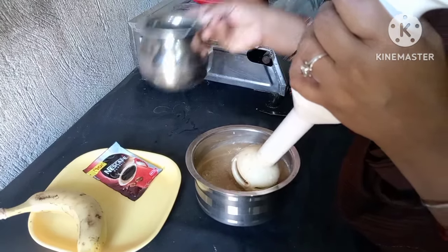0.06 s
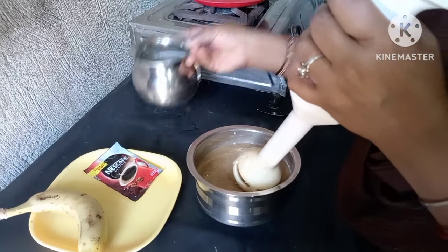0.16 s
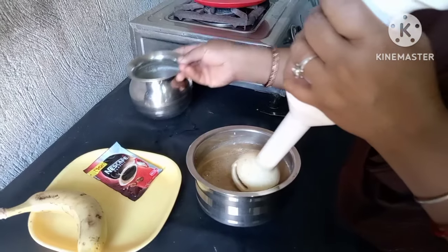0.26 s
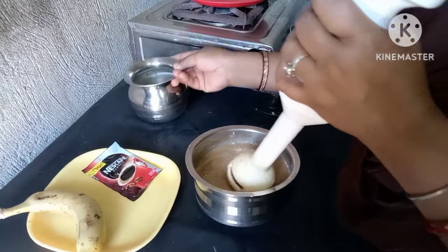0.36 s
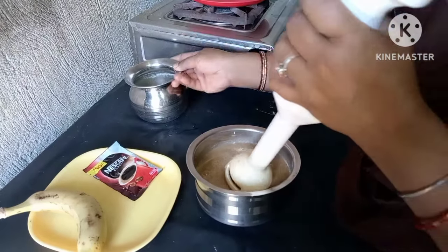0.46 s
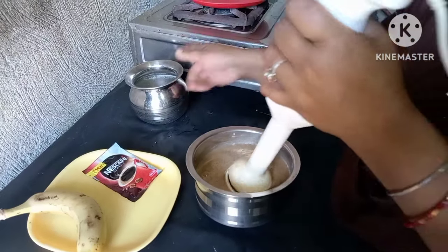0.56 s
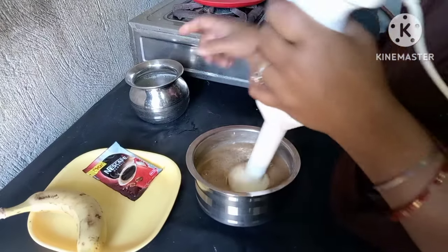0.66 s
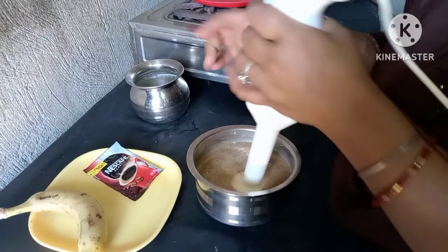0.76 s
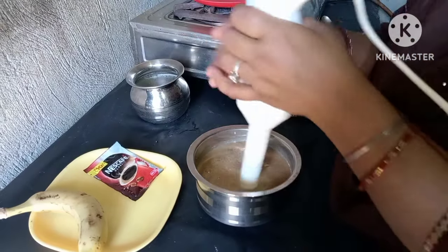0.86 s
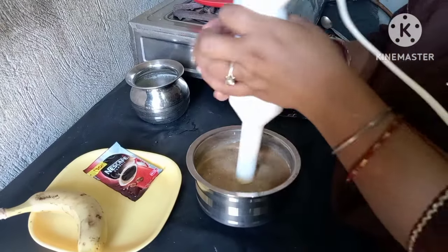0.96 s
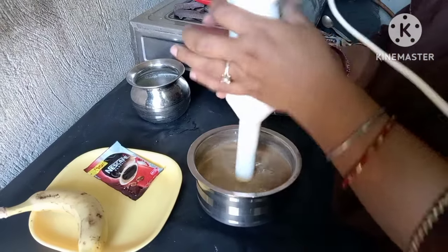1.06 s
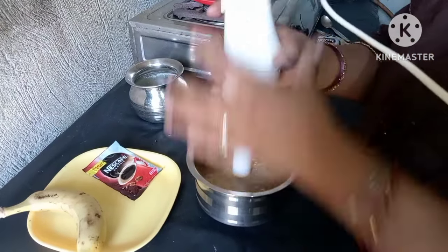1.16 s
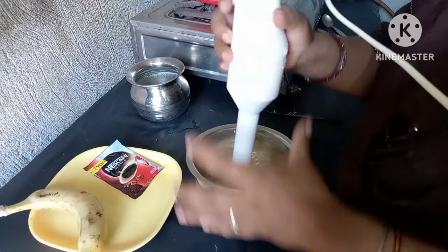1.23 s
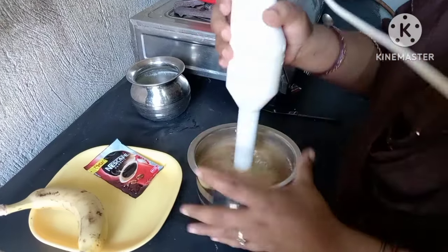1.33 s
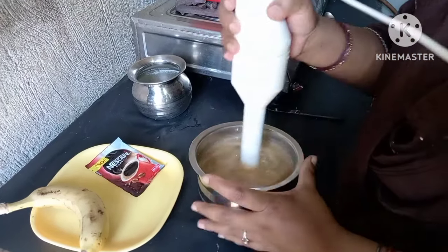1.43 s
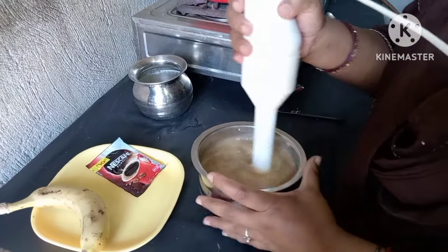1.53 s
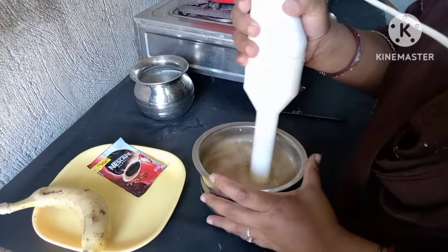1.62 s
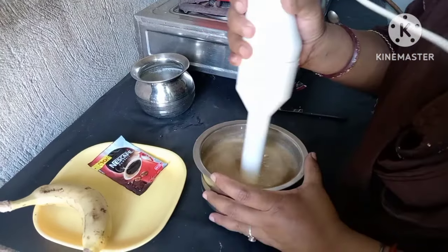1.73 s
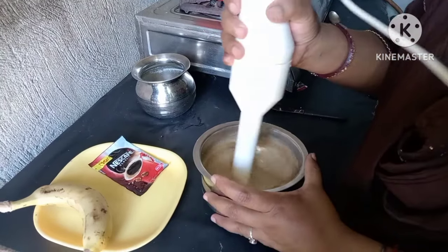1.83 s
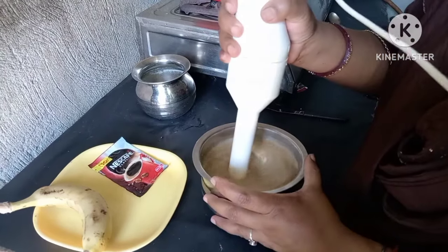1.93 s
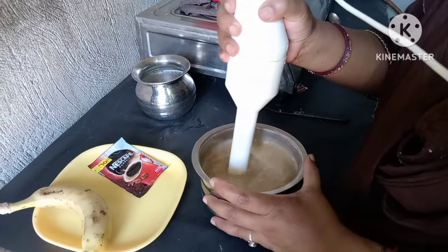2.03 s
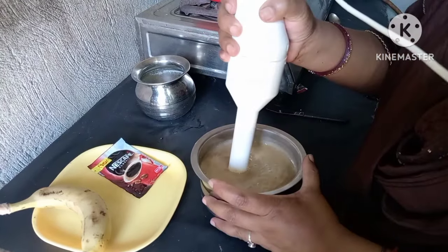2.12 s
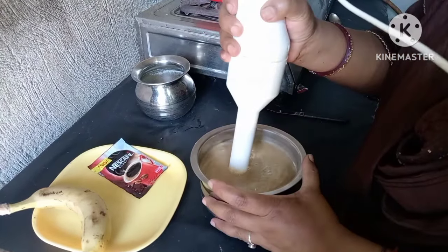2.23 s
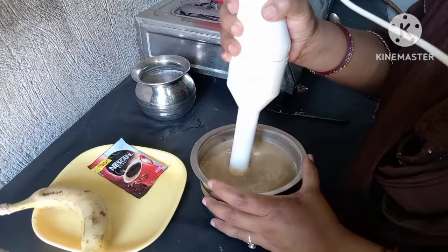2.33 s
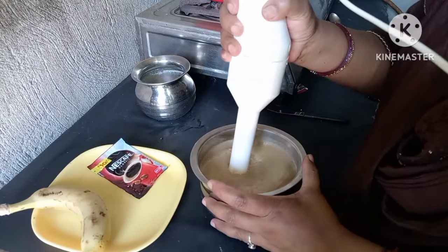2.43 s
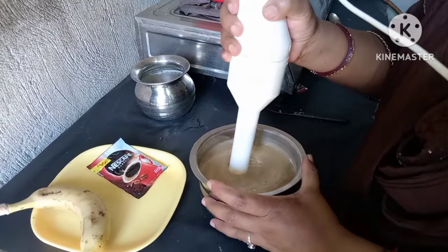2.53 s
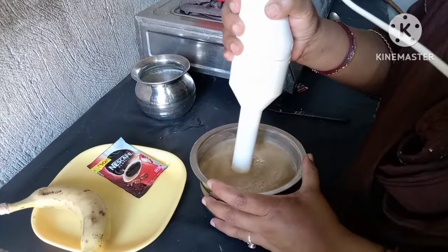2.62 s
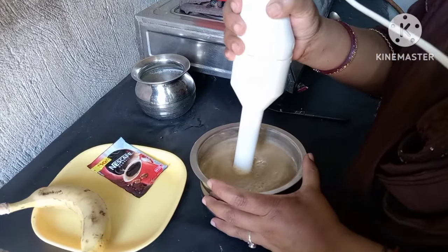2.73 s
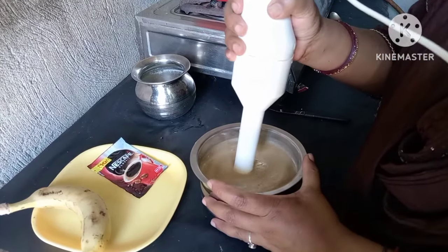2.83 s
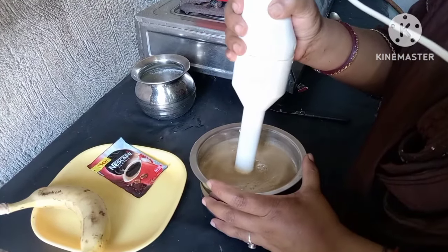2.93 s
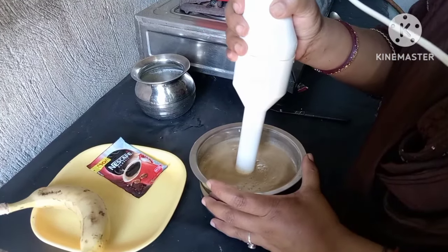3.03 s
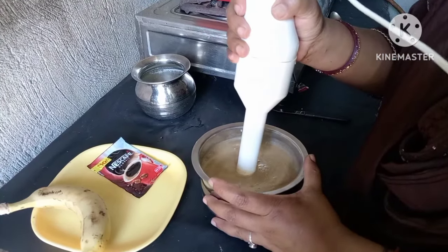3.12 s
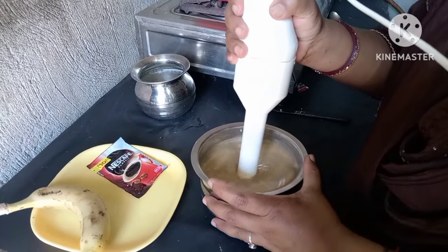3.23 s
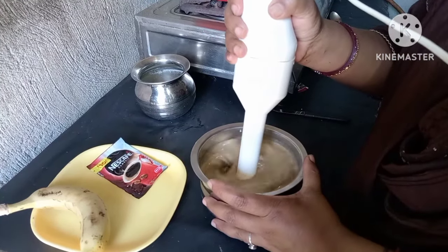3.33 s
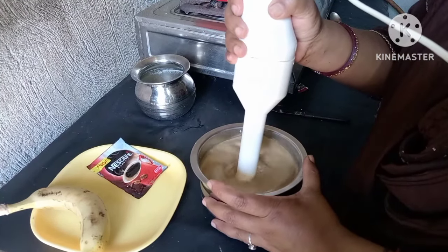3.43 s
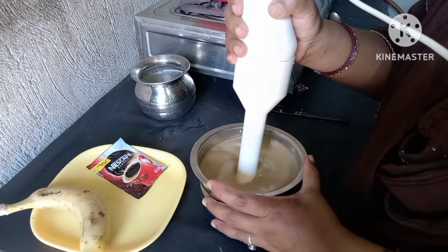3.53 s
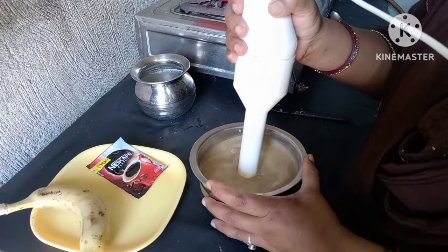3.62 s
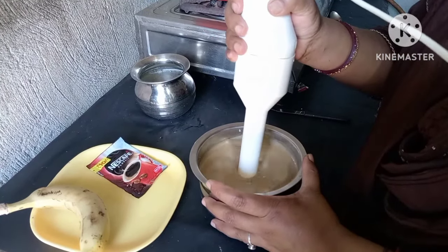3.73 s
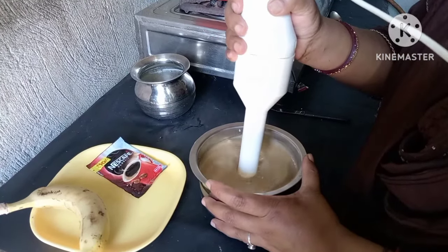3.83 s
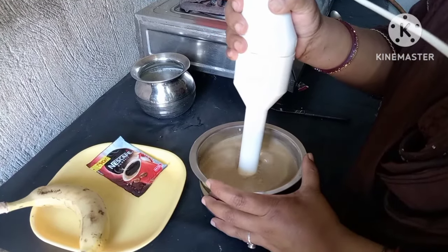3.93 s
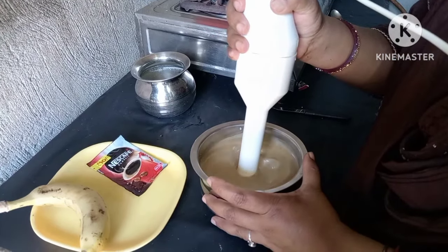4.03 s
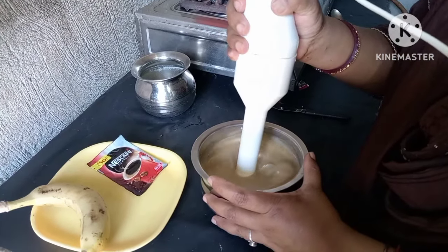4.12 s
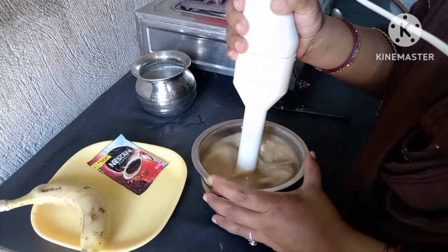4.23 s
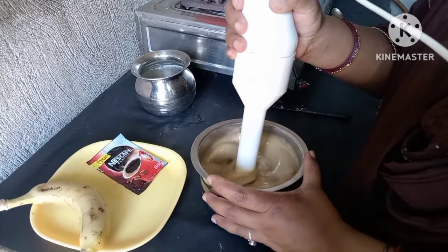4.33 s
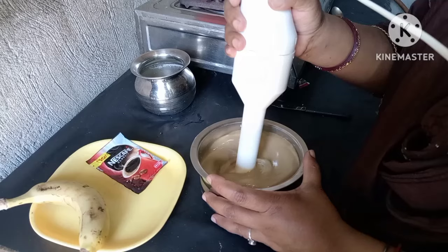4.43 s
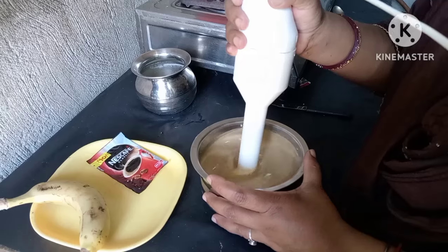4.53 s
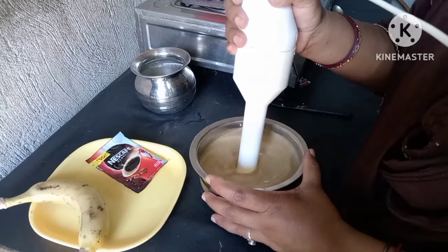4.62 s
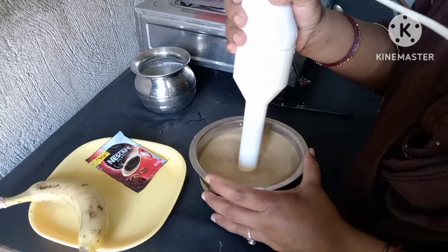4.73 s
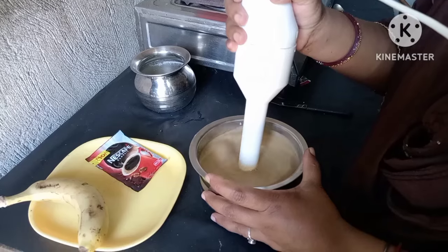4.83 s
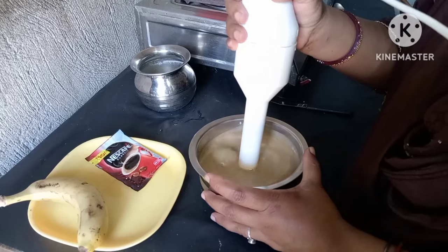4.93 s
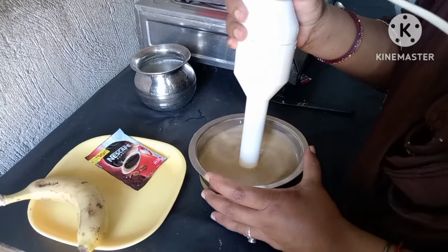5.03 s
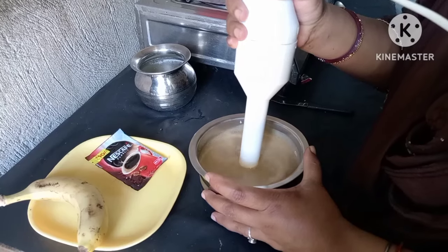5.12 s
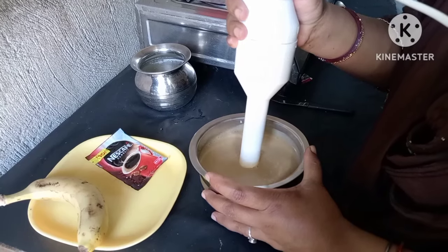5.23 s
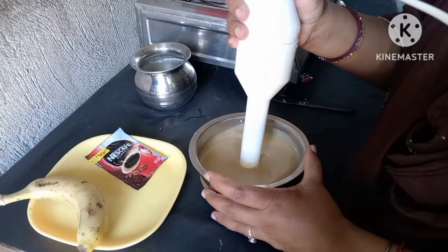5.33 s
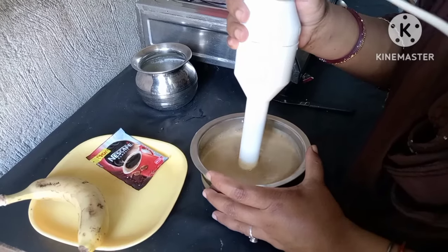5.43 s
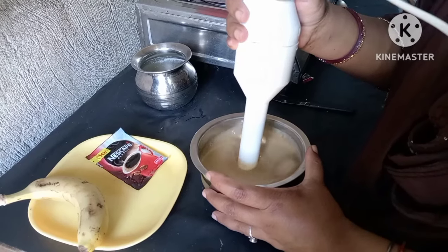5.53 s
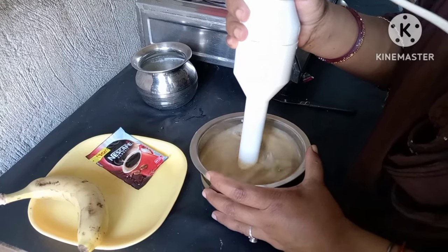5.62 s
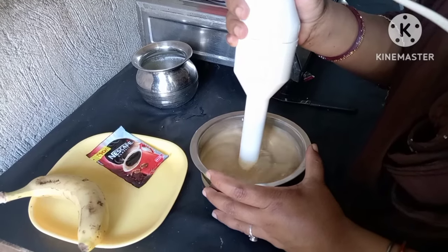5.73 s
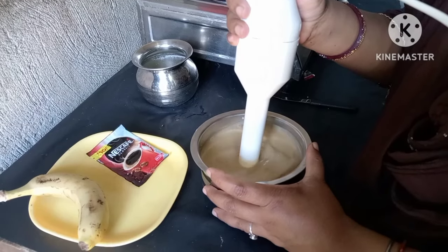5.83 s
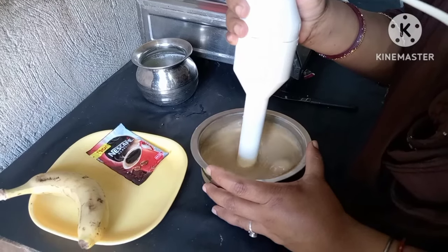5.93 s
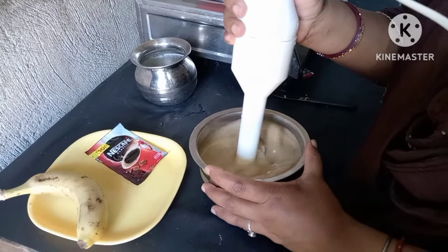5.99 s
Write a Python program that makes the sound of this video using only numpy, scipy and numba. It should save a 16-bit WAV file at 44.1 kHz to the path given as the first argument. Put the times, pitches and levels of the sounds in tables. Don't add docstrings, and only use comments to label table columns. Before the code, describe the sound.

Scattered counter knocks come first, low and solid with small plastic rattles and a steel clink, over soft room murmur. Then a button clicks and a hand blender bites into thick liquid in a steel pot, roaring briefly and cutting off fast. A longer burst follows, then soft bubbling glugs, then two more quick bursts, the last swelling with a ringing slap. Close, slightly overloaded phone sound with little echo.

```python
import sys
import numpy as np
from scipy import signal
from scipy.fft import rfft, irfft, next_fast_len
from scipy.io import wavfile
from scipy.ndimage import uniform_filter1d
from numba import njit

SR = 44100
rng = np.random.default_rng(int(sys.argv[2]) if len(sys.argv) > 2 else 0)


def gain_from_db(level_db):
    decades = np.asarray(level_db, float) / 20
    return 10 ** decades


def bounce(signal):
    frames = np.transpose(np.atleast_2d(signal))
    limited = np.clip(frames, -1, 1)
    pcm = np.round(limited * 32767).astype(np.int16)
    wavfile.write(sys.argv[1], SR, pcm)


N = 267157
T = np.arange(N) / SR


def level(x, db):
    return x * gain_from_db(db) / np.sqrt(np.mean(x ** 2))


def colour(x, table, sign=1):
    hz, db = np.transpose(table)
    size = next_fast_len(N + SR)
    f = np.maximum(np.arange(size // 2 + 1) * SR / size, 1)
    gain = gain_from_db(sign * np.interp(np.log(f), np.log(hz), db))
    return irfft(rfft(x, size) * gain, size)[..., :N]


@njit
def svf(x, hz, width):
    y, b, l = np.empty(len(x)), 0., 0.
    for i in range(len(x)):
        g, k = np.tan(np.pi * hz[i] / SR), width / hz[i]
        v = (b + g * (x[i] - l)) / (1 + g * (g + k))
        b, l, y[i] = 2 * v - b, l + 2 * g * v, k * v
    return y


def band(x, hz, width):
    return svf(x, np.full(N, float(hz)), float(width))


def walk(rate):
    k = int(SR / rate)
    steps = np.repeat(rng.standard_normal(N // k + 1), k)
    return 1.3 * uniform_filter1d(uniform_filter1d(steps, k), k)[:N]


def bump(s, half):
    return np.exp(-((T - s) / half) ** 2)


def slaps(rate, scatter_db):
    when, sign, size = rng.random(N), rng.standard_normal(N), rng.exponential(size=N)
    return (when < rate / SR) * np.sign(sign) * gain_from_db(scatter_db * np.minimum(size, 3))


def resonate(x, modes, drift):
    total = np.zeros(N)
    for hz, width, db in modes:
        moving_hz = hz * (1 + drift * walk(12))
        total += gain_from_db(db) * svf(x, moving_hz, 1. * width) / np.sqrt(width)
    return level(total, 0)


def add(out, s, modes, push=0.0002):
    i = int(s * SR)
    t = np.arange(min(SR // 2, N - i)) / SR
    hz, db, t60 = np.transpose(modes)[:, :, None]
    rings = gain_from_db(db - 60 * t / np.maximum(t60, .005)) * np.sin(2 * np.pi * hz * t)
    out[i:i + len(t)] += rings.sum(0) * (1 - np.exp(-t / push))


# [f/Hz, level/dB per Hz]
CHURN = [(120, -51), (200, -17), (308, -10.5), (345, -11.5), (382, -5.5), (650, -3.5), (1310, -8.5),
         (1450, -15), (3000, -19), (3900, -48.5), (6600, -120)]
# [f/Hz, level/dB per Hz]
HISS = [(760, -22.5), (1300, -2), (1460, -7.5), (1580, -3.5), (1810, -6.5), (2010, -2.5), (2470, -7.5),
        (2860, -6), (3300, -10.5), (3820, -7.5), (4880, -16.5), (5560, -19.5), (6290, -29.5), (7320, -38),
        (9520, -64), (16100, -120)]
# [f/Hz, width/Hz, level/dB]
POT_WALL = [(497.5, 7.6, -2.5), (691.6, 25, -1), (935, 99, -1), (1113, 32, -10), (1312, 18, -4.5),
            (2090, 90, -13.5)]
# [t/s, level/dB over churn, half length/s, f/Hz]
SWELLS = [(3.166, -10, .025, 270.7), (3.28, -13.5, 0.044, 360), (4.02, -8, .03, 290),
          (4.08, -10, 0.037, 335.7), (4.17, -3, 0.032, 353), (4.24, -8.5, 0.028, 350.4),
          (4.33, -4.5, 0.071, 392.2), (5.43, -7.5, .03, 320), (5.5, 3, 0.019, 329.9), (5.6, -3.5, .06, 355),
          (5.84, -7.5, 0.021, 338), (5.917, 12, 0.039, 344), (6.02, -4, 0.052, 341)]
POT_RING_DB, DULL_BELOW_DB, DULL_RANGE_DB = -19.5, -42.5, 25


def blender():
    churn_db, hiss_db, light_db, hum_db, shaft_hz, lean_db = presses()
    turn = 2 * np.pi * np.cumsum(shaft_hz * (1 + 0.028 * walk(30))) / SR
    blows = slaps(rate=1200, scatter_db=1.0)
    liquid = level(colour(blows, CHURN), -3.5)
    wall = level(resonate(blows, POT_WALL, drift=0.036), -12.5)
    vortex, power = funnels(blows)
    churn = (liquid + wall + vortex) / np.sqrt(0.51 + power)

    swell_s, _, _, swell_hz = np.transpose(SWELLS)
    ring_hz = np.interp(T, swell_s, swell_hz)
    swell = gain_from_db(POT_RING_DB) + sum(gain_from_db(db) * bump(s, half) for s, db, half, _ in SWELLS)
    sway = np.sin(2 * np.pi * np.cumsum(ring_hz) / SR) * gain_from_db(walk(25))
    ring = level(sway, -2) + level(svf(blows, ring_hz, 45.), -7)

    rumble = band(band(blows, 190, 230), 190, 230)
    hum = level(np.sin(turn) * gain_from_db(6.4 * walk(25)), -6.5) + level(rumble, -6)

    spray = rng.standard_normal(N) * (1 + 0.087 * np.cos(turn))
    spray += level(slaps(rate=2500, scatter_db=-1.0), -6)
    hiss = level(colour(spray, HISS) * gain_from_db(2.2 * walk(40)), 0)
    dull = np.clip((DULL_BELOW_DB - hiss_db) / DULL_RANGE_DB, 0, 1)
    hiss += dull * (signal.sosfilt(signal.butter(2, 2600, fs=SR, output="sos"), hiss) - hiss)
    brushes = level(band(band(spray, 5800, 2100), 5800, 2100), 0)
    hiss += gain_from_db(-19.5 + 2.2 * np.minimum(uniform_filter1d(light_db, size=2500), 6)) * brushes
    motor = gain_from_db(churn_db) * (churn + swell * ring) + gain_from_db(hum_db) * hum + gain_from_db(hiss_db) * hiss
    return motor, lean_db


# [down t/s, blades bite t/s, up t/s, full churn level/dB, coasting loss/dB per s]
PRESSES = [
    (3.077, 3.154, 3.223, -13.5, 119.5),
    (3.926, 3.967, 4.348, -16, 112.5),
    (5.31, 5.363, 5.451, -14, 129),
    (5.733, 5.82, 6.058, -17, 74),
]
# [churn held back before bite/dB, hiss over churn/dB, hum over churn/dB, lean left minus right/dB]
SEATING = [
    (9.2, -1, -13, 0),
    (21.47, -3.5, -16, 0.5),
    (10.8, -3.5, -18, -0.5),
    (2.99, -1.5, -19.5, 0.5),
]
# [t/s, churn loss/dB, slap level/dB]
GULPS = [
    (4.192, 3, 5),
    (4.11, -0.5, 2.5),
    (5.92, 2, 1.5),
]
START_DB, BITE_S, SAG_DB_PER_S = -61.5, 0.0062, 6.5
IDLE_HZ, FULL_HZ, SPIN_UP_S, COAST_HZ_PER_S = 95, 163.7, .07, 40
GULP_S, SPIN_CURVE, HISS_HELD = 0.016, 0.47, .3
HISS_LINGERS, HUM_LINGERS = 0.099, .35
LINGER_DB, HISS_GATED = 29, .2
LEAN_DB_PER_S = -7.5
GATE_DB, GATE_SLOPE = -43, 1.2


def gate(db):
    return db - GATE_SLOPE * np.maximum(GATE_DB - db, 0)


def presses():
    k = np.maximum(np.searchsorted(np.transpose(PRESSES)[0], T) - 1, 0)
    down, bite, up, full_db, coast = np.array(PRESSES)[k].T
    held_db, hiss_db, hum_db, lean_db = np.array(SEATING)[k].T
    spin = np.clip((T - down) / (bite - down), 0, 1) ** SPIN_CURVE
    motor_db = START_DB + (full_db - START_DB) * spin
    motor_db -= SAG_DB_PER_S * np.clip(T - bite, 0, up - bite)
    motor_db -= 200 * (T < down)
    loss = coast * np.maximum(T - up, 0)
    light = held_db * spin * np.clip((bite - T) / BITE_S, 0, 1)
    for s, dip, slap in GULPS:
        light += dip * bump(s, GULP_S) - slap * bump(s + 1.5 * GULP_S, .6 * GULP_S)

    coasting_db, spared_db = gate(motor_db - loss), np.minimum(loss, LINGER_DB)
    churn_db = coasting_db - light
    hiss_db = coasting_db + HISS_LINGERS * spared_db + hiss_db - HISS_HELD * light
    hiss_db -= HISS_GATED * np.maximum(loss - LINGER_DB, 0)
    hum_db = coasting_db + HUM_LINGERS * spared_db + hum_db
    shaft_hz = FULL_HZ - (FULL_HZ - IDLE_HZ) * np.exp(-np.maximum(T - down, 0) / SPIN_UP_S)
    shaft_hz -= COAST_HZ_PER_S * np.clip(T - up, 0, .5)
    lean_db = lean_db + LEAN_DB_PER_S * np.clip(T - down, 0, .6)
    return churn_db, hiss_db, light, hum_db, shaft_hz, lean_db


# [t/s, length/s, first f/Hz, last f/Hz, level/dB over churn]
FUNNELS = [(3.134, 0.07, 725, 708.6, -0.5), (3.18, .055, 605, 590, -6.5), (3.197, .07, 910, 876, -5),
           (3.223, 0.1, 790, 743, -6.5), (3.301, .3, 819.6, 680, -10), (3.986, .085, 877, 686, 0.5),
           (4.034, .14, 630, 463.7, 2), (3.971, .15, 1002, 877, -7.5), (4.091, .09, 750, 670, -3),
           (4.19, .045, 1140, 1135, -1.5), (4.237, 0.1, 1170, 1089, -7.5), (5.35, .13, 690, 611.7, -2.5),
           (5.356, 0.062, 960, 899, -8.5), (5.37, .14, 520, 448.5, -7), (5.842, .06, 945, 910, -12.5),
           (5.956, 0.064, 810, 792, -9.5)]


def funnels(blows):
    out, power = np.zeros(N), np.zeros(N)
    waver, flutter = 1 + .01 * walk(60), gain_from_db(1.5 * walk(50))
    for s, length, first_hz, last_hz, db in FUNNELS:
        part = np.arange(int(length * SR)) / (length * SR)
        span = slice(int(s * SR), int(s * SR) + len(part))
        hz = first_hz + (last_hz - first_hz) * part
        column = level(svf(blows[span], hz, 60.) + 0.46 * svf(blows[span], 1.4 * hz, 90.), -4)
        column += .9 * np.sin(2 * np.pi * np.cumsum(hz * waver[span]) / SR) * flutter[span]
        gain = gain_from_db(db) * np.sqrt(np.sin(np.pi * part))
        out[span] += gain * column
        power[span] += gain ** 2
    return out, power


# [t/s, peak level/dB, housing f/Hz]
SWITCH = [
    (3.079, -26.5, 587),
    (3.927, -35, 404),
    (5.312, -31.5, 442),
    (5.75, -22.5, 410.6),
]


def switch():
    out = np.zeros(N)
    for s, db, hz in SWITCH:
        add(out, s, [(hz, db - 10, .08), (1.3 * hz, db - 11, .06), (2050, db - 19, .05)])
    return out


# [t/s, thud level/dB, body over thud/dB, clink over thud/dB, t60/s]
FOOT_KNOCKS = [
    (0.41, -43, -8, -10, 0.092),
    (0.861, -52, 0, -9, 0.4),
    (0.991, -25, -6.5, -37, 0.18),
    (1.211, -28, -2.5, -28.5, 0.2),
    (1.522, -28, -5, -38, 0.28),
    (1.862, -36.5, -2.5, -33, 0.21),
]
JUG_KNOCKS = [
    (0.419, -36.5, -5, -1, 0.072),
    (0.43, -17.5, -12.5, -38, 0.38),
    (0.763, -48.5, 5.5, -16.5, 0.24),
    (0.89, -24, -4, -37, 0.22),
    (2.502, -48.5, -10, -26.5, 0.25),
]
SETTLES = [
    (0.459, -35, 0.5, -23.5, 0.37),
    (0.914, -31.5, -9.5, -35, 0.067),
    (1.029, -34, -8, -25, 0.26),
    (1.277, -39, -8, -28, 0.4),
    (1.305, -38.5, -7.5, -34, 0.34),
    (1.559, -28.5, -20, -38, 0.15),
    (1.589, -40.5, -14, -30, .08),
    (1.701, -53.5, 10, -10, 0.17),
]
# [body f/Hz, contact/s, chatter over body/dB]
STRUCK = [
    (670, 0.00015, -6.5),
    (290, 0.00022, -10.5),
    (290, 0.019, -6),
]
# [f/Hz, level/dB]
COUNTER = [(105, -2), (124, 1), (155, 2), (190, -4), (250, -7), (330, -7)]
# [f/Hz, width/Hz, level/dB]
FOOT = [(365, 270, 6.5), (660, 130, 1), (910, 69, -2.5), (1220, 430, -20), (1850, 810, -10.5)]
# [f/Hz, width/Hz, level/dB]
STEEL = [(2410, 120, 1.5), (2966, 210, -4), (3390, 170, -8), (3960, 320, 4.5), (4620, 350, -1),
         (5240, 240, -5), (5710, 1300, 2), (6500, 100, -17)]


def knocks():
    out, chatter, clink = np.zeros(N), np.zeros(N), np.zeros(N)
    for rows, (body_hz, contact, chatter_db) in zip([FOOT_KNOCKS, JUG_KNOCKS, SETTLES], STRUCK):
        scatter = rng.standard_normal((len(rows), len(COUNTER)))
        for (s, db, body_db, clink_db, t60), luck in zip(rows, scatter):
            body_db = db + body_db
            clink_db = db + clink_db
            thud = [(hz, db + d - 6.5 + 2 * x, t60) for (hz, d), x in zip(COUNTER, luck)]
            add(out, s, thud, push=0.0015 + contact)
            body = [(body_hz, body_db, 0.33 * t60), (2100, body_db - 17, .04), (1350, body_db - 11, .05)]
            add(out, s, body, push=contact)
            add(out, s + 0.0022, [(680, body_db, 0.025)], push=contact)
            after = np.maximum(T - s, 0)
            fade_db, rise = -60 * after / max(t60, .02), 1 - np.exp(-after / contact)
            chatter += rise * gain_from_db(body_db + chatter_db + fade_db)
            clink += rise * (gain_from_db(clink_db + fade_db) + gain_from_db(clink_db - 22 + 0.26 * fade_db))
    chatter, clink = uniform_filter1d([chatter, clink], size=90, origin=44)
    grit = slaps(rate=1500, scatter_db=2.5)
    foot = signal.sosfilt(signal.butter(6, 2500, fs=SR, output="sos"), resonate(grit, FOOT, drift=0.086))
    scratch = level(band(rng.standard_normal(N), 3500, 4900), -3) * gain_from_db(2.9 * walk(41.4))
    return out + chatter * foot + clink * (resonate(grit, STEEL, drift=0.0095) + scratch)


# [t/s, peak level/dB, f/Hz, neighbour notes level/dB]
GLUGS = [
    (4.821, -29.5, 397.5, -10.5),
    (4.832, -30.5, 397.5, -6),
    (4.892, -29.5, 390, -5),
    (4.912, -28, 408, -17),
    (4.95, -30, 463, -3),
    (4.965, -41.5, 494, 6.5),
    (5.009, -45.5, 435, -13.5),
]
# [f/Hz, level/dB, t60/s]
GLUG_POT = [(168, -7, 0.21), (300, 0.5, 0.095), (468, -8.5, 0.084), (950, -21, 0.071)]
# [t/s, f/Hz, level/dB, length/s]
RINGS = [(2.0, 4900, -72, .07), (2.6, 4800, -73, .08), (2.24, 3700, -73, .05), (3.79, 590, -62, .1),
         (4.73, 545, -68, .07), (1.70, 2600, -62, .04), (4.95, 1000, -58, .04), (2.9, 880, -68, .08),
         (.422, 5950, -50, .025), (.42, 4000, -50, .02), (.515, 4300, -56, .07), (.52, 5700, -61, .07),
         (.52, 6500, -62, .07), (.46, 3050, -60, .04), (.765, 5800, -63, .04), (1.04, 3300, -66, .06),
         (1.27, 2330, -66, .14), (1.32, 3420, -70, .1), (1.33, 4400, -72, .06), (4.56, 4000, -56, .025)]


def glugs():
    out, fizz = np.zeros(N), np.zeros(N)
    waver, shake = gain_from_db(3 * walk(60)), walk(120)
    for s, db, hz, near_db in GLUGS:
        pot = [(f, db + near_db + d, t60) for f, d, t60 in GLUG_POT]
        add(out, s, [(hz, db - 0.5, .12)] + pot, push=0.0018)
        fizz += (T >= s) * gain_from_db(db - 39.5 - 60 * np.maximum(T - s, 0) / 0.29)
    for s, hz, db, length in RINGS:
        swell = np.sin(np.pi * np.clip((T - s) / length, 0, 1))
        out += gain_from_db(db) * waver * swell * np.sin(2 * np.pi * hz * T + hz / 6000 * shake)
    return out + band(fizz * rng.standard_normal(N), 1500, 3000)


def echo(x, t60, smooth=20):
    t = np.arange(SR // 2) / SR
    tail = rfft(rng.standard_normal(len(t)) * gain_from_db(-60 * t / t60))
    even = tail / np.sqrt(uniform_filter1d(np.abs(tail) ** 2, int(smooth)))
    tail = irfft(even) * gain_from_db(-30 * t / t60)
    return signal.fftconvolve(x, tail / np.linalg.norm(tail))[:N]


# [f/Hz, level/dB per Hz]
KITCHEN = [(24, -45), (40, -19), (69, 0.5), (151, -0.5), (317, -6), (597, -8), (651, -7), (742, -10),
           (810, -10), (1370, -17.5), (2410, -21), (5390, -33.5), (7320, -48), (9520, -75), (16100, -120)]
# [f/Hz, width/Hz, level/dB]
KITCHEN_TONES = [(2340, 60, 1.5), (5430, 40, 3), (1600, 60, -4)]
# [t/s, level/dB, half length/s]
STIRS = [
    (.39, 4, 0.073),
    (2.5, 0, 0.091),
    (1.077, 5.5, 0.61),
    (3.009, 3, .4),
    (3.858, 4.5, 0.096),
    (4.953, 13, .1),
    (5.9, 17.5, 0.55),
]
KITCHEN_LEVEL_DB, DUCK_DB, DUCK_S = -59.5, -10, .12


def kitchen():
    murmur = np.zeros(N)
    for hz in 50 * 2 ** np.arange(0, 7.6, .5):
        murmur += gain_from_db(2.1 * walk(15)) * band(rng.standard_normal(N), hz, hz / 3) / np.sqrt(hz)
    air = level(colour(np.gradient(murmur) + 0.079 * murmur, KITCHEN), 0)
    tones = gain_from_db(-29 + 5 * walk(8)) * resonate(rng.standard_normal(N), KITCHEN_TONES, drift=.006)
    room_db = KITCHEN_LEVEL_DB + DUCK_DB * np.clip((T - PRESSES[0][0]) / DUCK_S, 0, 1)
    room_db += sum(db * bump(s, half) for s, db, half in STIRS)
    return (air + tones) * gain_from_db(room_db)


# [f/Hz, side minus mid level/dB]
WIDTH = [(60, -12), (100, -15), (170, -16), (290, -17), (490, -11), (840, -7), (1410, -2), (2400, -3),
         (4060, -1), (6870, 0)]
# [f/Hz, left minus right level/dB]
TILT = [(60, 5.5), (100, -1.5), (170, 2), (290, -0.5), (490, -0.5), (840, 1.5), (1410, -2), (2400, -3.5),
        (4060, -4.5), (6870, -5.5)]


def scene():
    motor, lean_db = blender()
    hits = knocks() + switch()
    mid = motor + hits + gain_from_db(-3) * echo(hits, 0.1) + glugs() + kitchen()
    shift = 2 * np.pi * walk(5)
    side = colour(np.cos(shift) * echo(mid, .12) + np.sin(shift) * echo(mid, .12), WIDTH)
    side += np.tanh(0.047 * lean_db) * band(motor, 2800, 4000)
    return np.array([colour(mid + side, TILT, 1 / 2), colour(mid - side, TILT, -1 / 2)])


def top_cut(x):
    return signal.sosfilt(signal.butter(12, 15480, fs=SR, output="sos"), x)


# [f/Hz, level/dB]
MICROPHONE = [(20, -26), (90, -1), (6300, -1), (7300, -12.5), (8200, -21), (9500, -39.5), (16000, -65)]
# [t/s, haze lift level/dB]
CRACKLES = [
    (.421, 32),
    (3.161, 16),
    (4.02, 8),
    (4.149, 3),
    (5.37, 11.5),
    (5.916, 18),
    (6.05, 20),
]


def record(dry):
    held = .95 * np.tanh(dry / .95)
    bass_cut = signal.butter(2, 85, "high", fs=SR, output="sos")
    heard = signal.sosfilt(bass_cut, colour(held, MICROPHONE))
    haze_db = -48.5 + 4.6 * walk(33) + sum(db * bump(s, .004) for s, db in CRACKLES)
    haze = gain_from_db(haze_db) * heard ** 2 * rng.standard_normal(dry.shape)
    mix = heard + haze + gain_from_db(-81) * rng.standard_normal(dry.shape)
    return top_cut(mix)


dry = scene()
out = record(dry)
bounce(out)
```